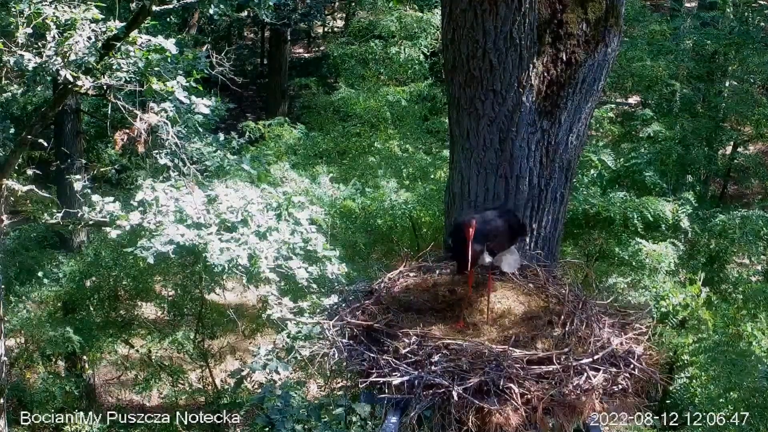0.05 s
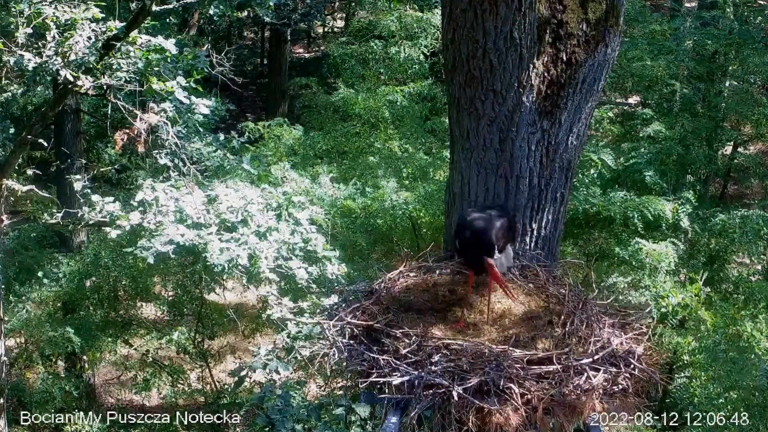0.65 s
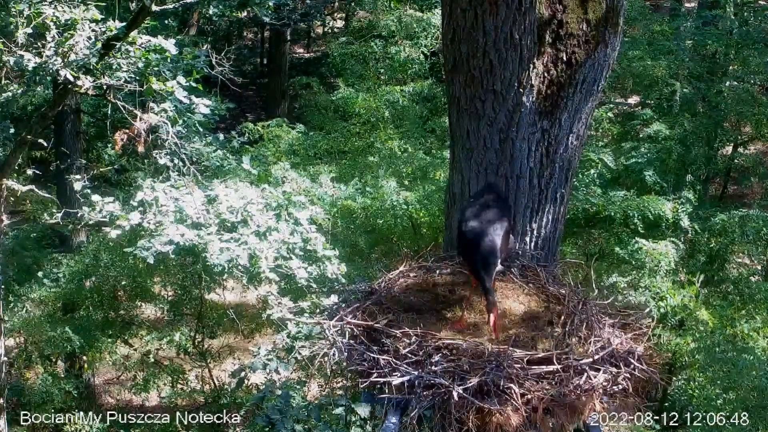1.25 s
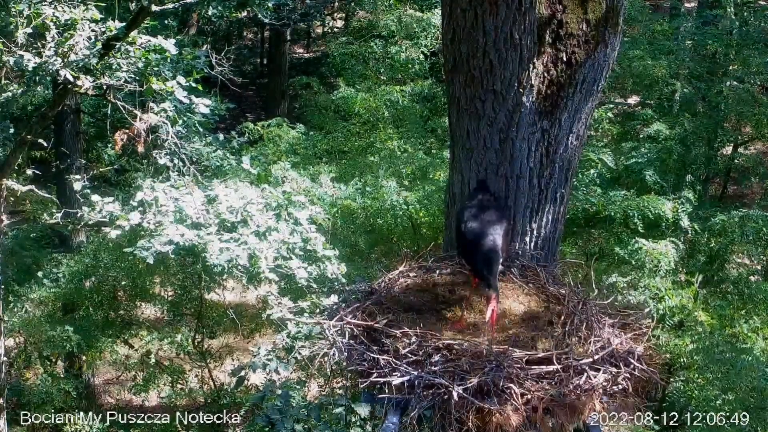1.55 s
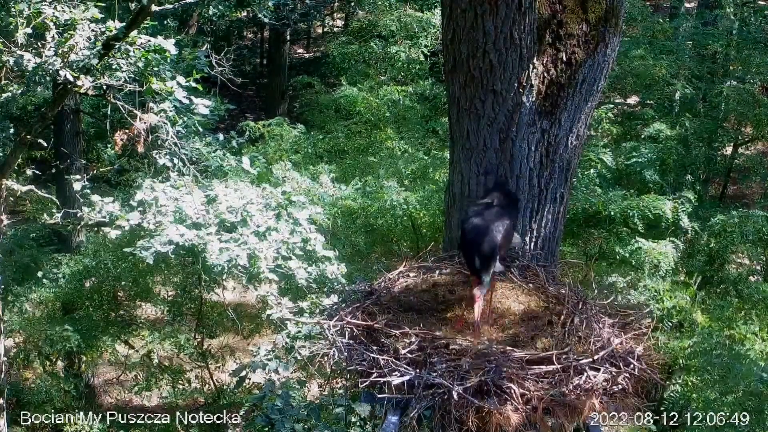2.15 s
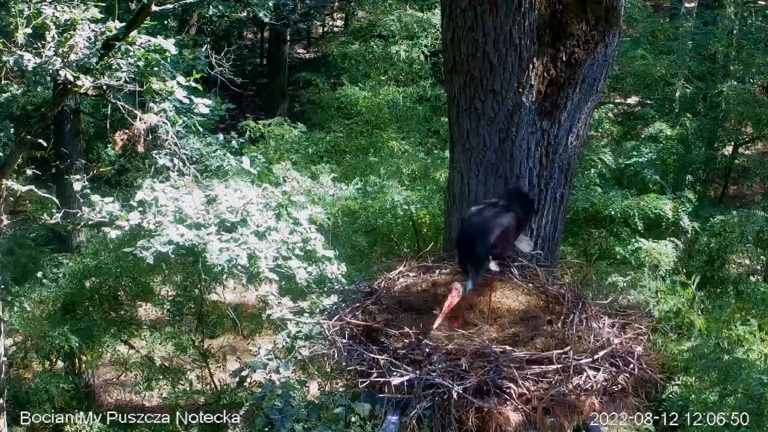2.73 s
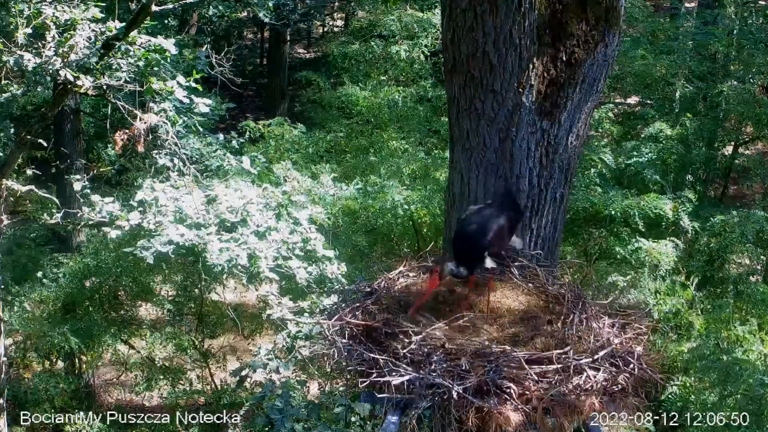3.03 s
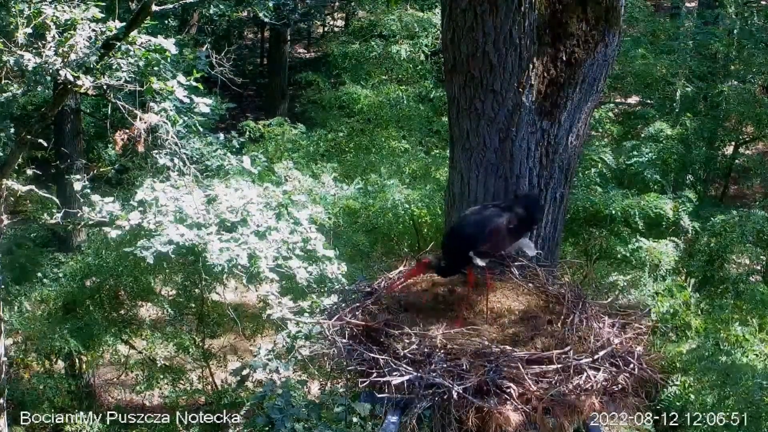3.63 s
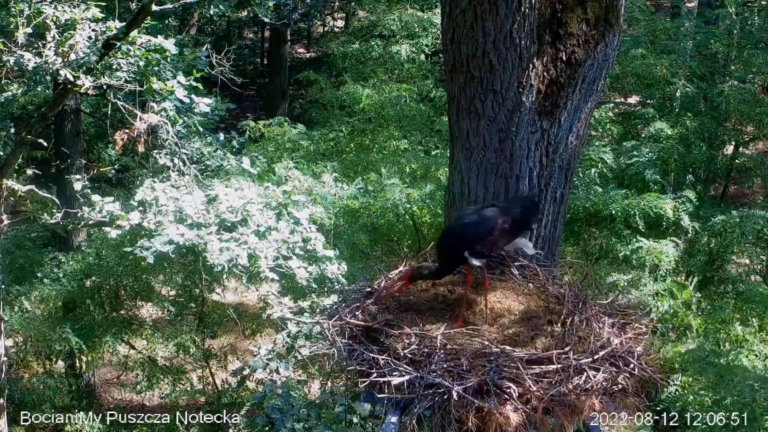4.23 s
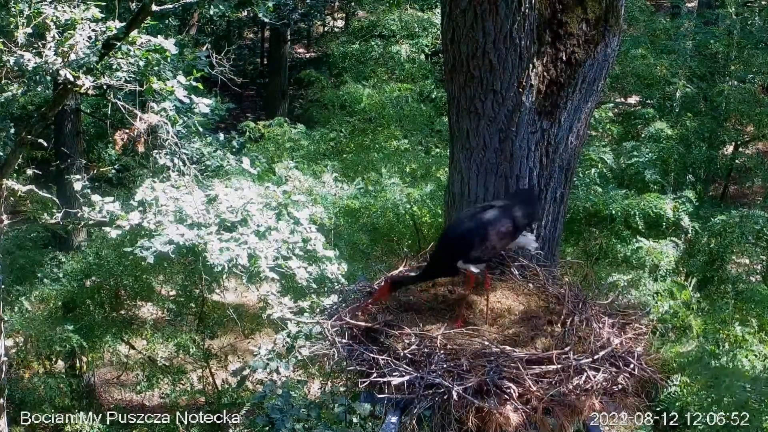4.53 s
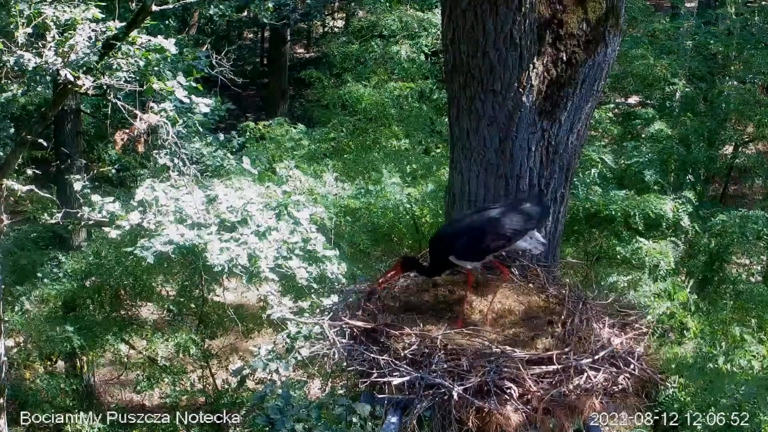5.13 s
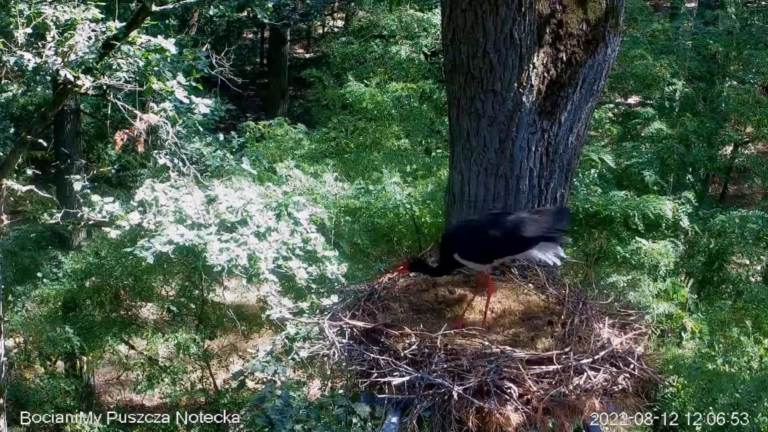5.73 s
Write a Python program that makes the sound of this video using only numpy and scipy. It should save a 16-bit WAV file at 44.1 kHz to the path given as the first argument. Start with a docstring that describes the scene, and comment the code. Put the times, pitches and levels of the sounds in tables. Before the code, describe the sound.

A young stork begs with repeated hoarse whistles and harsh hisses, while twigs snap and its steps thump softly in a forest nest.

```python
"""A young black stork begs on its nest

Each call is an arched, breathy whistle from the bird's voice box, mostly breaking to a low note,
then a harsh hiss of air in its throat. Short chirps run through the first calls.
Its steps thump through the stick nest and snap twigs. The trees return a soft echo
over a steady wash of forest air. One microphone near the nest hears it all."""
import sys
import numpy as np
from scipy import signal
from scipy.fft import rfft, irfft
from scipy.io import wavfile
from scipy.ndimage import uniform_filter1d, map_coordinates

SR = 44100
rng = np.random.default_rng(int(sys.argv[2]) if len(sys.argv) > 2 else 0)


def wav_out(sig):
    """Save sig, one row per channel (or a flat mono array), as 16-bit PCM at SR to the path in sys.argv[1]."""
    wavfile.write(sys.argv[1], SR, np.round(np.clip(np.atleast_2d(sig).T, -1, 1) * 32767).astype(np.int16))


N = 263718
TIME = np.arange(N) / SR


def whistles(overtone_db=-1, third_db=-28, breath_db=-3, jitter=.0062, hoarse_hz=280):
    """The voice box makes an unsteady, hoarse tone while air rushes through the open bill."""
    # Each row is a whistle: start, end and top of the climb in seconds, start and top pitch in Hz,
    # then in dB the tone's base level, its swell, and base levels of second harmonic, breath and rattle.
    high_notes = [ (.163, 0.425, .335, 1895, 1965, -29, 14, -39, -31, -42.5),
                  (0.799, 1.091, 1.0, 1915, 2057, -24.5, 15, -34, -27.5, -31.5),
                  (1.514, 1.87, 1.63, 2220, 2311, -23.5, 9.5, -33.5, -32.5, -27),
                  (2.308, 2.58, 2.48, 2053, 2123, -27.5, 2, -41.5, -33, -34.5),
                  (3.028, 3.327, 3.22, 1950, 2097, -28.5, 8.5, -35.5, -30, -30),
                  (3.808, 4.159, 3.97, 1833, 2032, -31.5, 13, -46.5, -30.5, -36),
                  (4.572, 4.869, 4.79, 2170, 2288, -25.5, 8, -43, -35, -31),
                  (5.271, 5.602, 5.48, 1947, 1985, -33.5, 4, -45, -35.5, -37.5), ]
    # Each row is a low note: start and end in seconds, start pitch in Hz,
    # base levels of the tone and its second harmonic in dB.
    low_notes = [(0.423, 0.478, 1344, -44.5, -31.5), (1.864, 1.951, 1371, -46.5, -32.5),
                 (2.573, 2.647, 1275, -48, -37), (3.321, 3.425, 1262, -40.5, -29),
                 (4.154, 4.212, 1330, -49.5, -28), (5.602, 5.675, 1226, -44.5, -35)]
    # The tone colour of the breath. Each row: frequency in Hz, gain in dB.
    breath_colour = [(900, -22.5), (1750, -13.5), (2100, -2), (2550, 2.5), (3050, -7), (3650, 6.5),
                     (4050, -1.5), (4350, -13), (5200, -12), (5800, -26.5), (7600, -28.5), (8900, -57.5)]
    # The breath's treble changes as the bird turns. Each row: time in seconds, treble gain in dB.
    facing = [(0, 2), (1, -2), (1.7, 8), (2.4, 4), (3.2, -1.5), (4, -6), (4.7, 3), (5.4, -12)]
    air = noise(breath_colour)
    air = air + (amp(np.interp(TIME, *np.transpose(facing))) - 1) * treble_of(air)
    waver = 1 + jitter * wobble(150)
    flutter = amp(.9 * wobble(90) + 1.4 * wobble(22))
    # The air stream rattles the membrane, adding ragged sound just above and below the tone.
    rattle = np.exp(2j * np.pi * np.cumsum(hoarse_hz * (1 + .29 * wobble(60))) / SR)
    hoarse = .5 * (rattle * wobble(60) + wobble(49) / rattle)
    rasp = 1 + .22 * (wobble(300) + 1j * wobble(300))
    notes = [whistle_shape(*row) for row in high_notes] + [low_note_shape(*row) for row in low_notes]
    out, ragged = np.zeros(N), np.zeros(N)
    for at, gate, hz, db, second_db, air_db, rattle_db in notes:
        wave = np.exp(2j * np.pi * np.cumsum(hz * waver[at]) / SR)
        # The tone falters while the pitch leaps.
        leap_speed = uniform_filter1d(np.gradient(np.log(hz)) * SR / 20, size=130)
        held = 1 / (1 + leap_speed ** 2)
        overtones = amp(second_db + overtone_db) * rasp[at] * (wave ** 2 + amp(third_db) * wave ** 3)
        tone = np.sqrt(2) * held * flutter[at] * (amp(db) * wave + overtones).imag
        out[at] += gate * (tone + amp(air_db + breath_db) * air[at])
        ragged[at] += gate * amp(rattle_db) * (hoarse[at] * wave).imag
    return out + coloured(ragged, breath_colour)


def whistle_shape(start, end, top_s, start_hz, top_hz, level_db, swell_db, second_db, air_db, rattle_db):
    """A whistle climbs and swells, leaps in pitch, and sags as the air runs out."""
    # The voice slips up to a higher pitch, then drops back.
    # Each row: start, end and rise time in seconds, pitch step in Hz, level step in dB.
    leaps = [(.886, 1.049, .008, 200, 6.5), (1.002, 1.038, .008, 235, -1), (1.565, 1.819, .045, 107, 8),
             (1.684, 1.818, 0.0061, 166, -5), (3.062, 3.29, .008, 153, 6.5), (3.929, 4.089, 0.0088, 52, 0),
             (4.616, 4.813, .028, 19, 9), (4.638, 4.813, 0.13, 148, 1), (5.306, 5.566, 0.011, 148, 10)]
    sag_s, sag_to_hz, sag_db = .09, 1750, -12.5
    usual_hz, overtone_db_per_octave = 2122, -30
    at, t = span(start, end)
    to_climb = np.clip((top_s - t) / (top_s - start), 0, 1)
    sag = np.clip(1 - (end - t) / sag_s, 0, 1) ** 2.3
    hz = top_hz + (start_hz - top_hz) * np.sin(np.pi / 2 * to_climb) ** 2 + (sag_to_hz - top_hz) * sag
    db = level_db - swell_db * to_climb + sag_db * sag
    for up, down, rise_s, step_hz, step_db in leaps:
        leapt = ramp(t, up, down, rise_s, release_s=.0098)
        hz, db = hz + step_hz * leapt, db + step_db * leapt
    # The throat passes less of the second harmonic as the pitch rises.
    throat_db = overtone_db_per_octave * np.log2(hz / usual_hz)
    effort_db = db - db.max()  # harmonic, breath and rattle partly follow the tone's level
    gate = ramp(t, start, end, attack_s=.013, release_s=.022)
    return (at, gate, hz, db, second_db + .5 * effort_db + throat_db,
            air_db + .31 * effort_db, rattle_db + .43 * effort_db)


def low_note_shape(start, end, start_hz, level_db, second_db, end_hz=1050, swell_db=10):
    """A whistle breaks into a low note that slides down; its second harmonic and breath die first."""
    at, t = span(start, end)
    progress = (t - start) / (end - start)
    hz = start_hz * (end_hz / start_hz) ** (progress ** .91)
    db = level_db + swell_db * (np.sin(np.pi * progress) - 1)
    air_db, rattle_db = -45 - 13.5 * progress, db - 4.5
    gate = ramp(t, start, end, attack_s=.004, release_s=.0041)
    return at, gate, hz, db, second_db - 21 * progress, air_db, rattle_db


def hisses(usual_treble_db=-13, rasp_db=.5, rasp_hz=350, shut_db=-1.5, shut_treble_db=-4):
    """Air sputters in the throat, which rings higher as the bill opens and lower as it snaps shut."""
    # Each row is a hiss: start and end in seconds, base level in dB, treble setting in dB.
    bursts = [(-.18, .05, -22.5, -13), (.495, .722, -25, -16), (1.223, 1.468, -24.5, -11),
              (1.974, 2.188, -26.5, -11.5), (2.664, 2.911, -26, -11.5), (3.446, 3.674, -26, -21),
              (4.224, 4.475, -29, -18.5), (4.946, 5.178, -32, -21), (5.694, 5.919, -30, -27)]
    # The throat's tone colour in a hiss. Each row: frequency in Hz, gain in dB.
    hiss_colour = [(900, -30), (1750, -25), (2050, -11.5), (2400, -3.5), (2700, 0), (3050, -9), (3600, 1.5),
                   (4000, -8.5), (4300, -14.5), (4750, -9.5), (5350, -18.5), (5800, -31), (7600, -29.5),
                   (8900, -65)]
    sputter = rng.standard_normal(N) * amp(rasp_db * wobble(rasp_hz))
    air = unit_level(coloured(sputter, hiss_colour))
    out, treble = np.zeros(N), treble_of(air)
    for start, end, level_db, treble_db in bursts:
        at, t = span(start, end)
        opening = np.sin(np.pi * ((t - start) / (end - start)) ** 1.25)
        # A shut bill makes the hiss duller and weaker.
        treble_gain = amp(treble_db + shut_treble_db * (1.5 - opening) - usual_treble_db)
        hiss = air[at] + (treble_gain - 1) * treble[at]
        loudness = amp(level_db + shut_db * (2 - opening))
        gate = ramp(t, start, end, attack_s=.025, release_s=.026)
        position = np.cumsum(1 + .09 * (opening - opening.mean()))  # played faster, it sounds higher
        out[at] += gate * loudness * map_coordinates(hiss, [position], order=5, mode="mirror")
    return out


def chirps(harmonics=8, lowest_db=-37, lowest_db_per_octave=22):
    """The pitch flicks up and down, sweeping its harmonics through the ranges where the throat rings."""
    # Each row is a chirp: time of its top in seconds, base pitch in Hz, gain of its overtones in dB.
    flicks = [(.114, 1460, -16), (.301, 1386, -20.5), (.503, 1310, -20.5), (.709, 1264, -21.5),
              (.908, 1145, -26), (1.121, 1164, -25), (1.339, 1107, -29.5), (1.538, 1162, -31)]
    # The shape of every chirp. Each row: seconds from its top, share of the base pitch, gain in dB.
    shape = [(-.032, 0.51, -24), (-.016, 0.78, -13.5), (-.010, 0.8, -9.5), (-.004, 0.82, -1.5),
             (0, 0.97, -1.5), (.004, 0.93, 1), (.008, 0.77, -3), (.014, 0.76, -11.5), (.022, 0.43, -16)]
    # The throat's tone colour in a chirp. Each row: frequency in Hz, gain in dB.
    chirp_colour = [(1100, -24), (1450, -18.5), (1800, -17.5), (2300, -8.5), (2900, -1), (3500, -0.5),
                    (4100, -9), (4600, -21.5), (5400, -18.5), (6000, -55), (7300, -30.5), (8200, -38),
                    (9200, -60)]
    waver, scratch = 1 + .009 * wobble(500), amp(2 * wobble(300))
    out = np.zeros(N)
    for top_s, base_hz, overtones_db in flicks:
        at, gate, (share, db) = curves([(top_s + dt, share, db) for dt, share, db in shape])
        hz = base_hz * share
        phase = 2 * np.pi * np.cumsum(hz * waver[at]) / SR
        lowest = amp(lowest_db + lowest_db_per_octave * np.log2(share)) * np.sin(phase)
        overtones = sum(amp(look_up(chirp_colour, k * hz)) * np.sin(k * phase)
                        for k in range(2, harmonics + 1))
        out[at] += gate * amp(db) * np.sqrt(2) * scratch[at] * (lowest + amp(overtones_db) * overtones)
    return out


def twigs(ring_s=.00032, tick_hz=5200, tick_s=.00013, rattle_db=-19, rattle_s=.008):
    """A dry stick, snapped or pecked, gives a dead knock and a bright tick; its neighbours rattle."""
    # Each row: time in seconds, base level in dB, knock pitch in Hz, tick compared with knock in dB.
    snaps = [(.957, -15.5, 950, -9), (1.194, -29.5, 1407, 1.5), (1.496, -42.5, 1300, 10),
             (2.22, -31.5, 1720, -11), (2.703, -8, 1140, -17.5), (2.711, -16, 1550, -0.5),
             (2.9876, -10, 1300, -21.5), (3.011, -21.5, 2900, -14), (3.087, -25.5, 1194, -1),
             (3.414, -14.5, 1200, -33), (3.417, -42, 900, -6), (4.148, -19, 1400, -5),
             (4.525, -30.5, 2700, -11)]
    # The tone colour of the sticks. Each row: frequency in Hz, gain in dB.
    twig_colour = [(100, -11), (500, -4.5), (5500, 10), (6500, -3.5), (8000, -3), (9200, -40)]
    out, t = np.zeros(N), np.arange(4000) / SR
    for start, db, hz, tick_db in snaps:
        knock = np.sin(2 * np.pi * hz * t) * np.exp(-t / ring_s)
        tick = amp(tick_db) * np.sin(2 * np.pi * tick_hz * t) * np.exp(-t / tick_s)
        rattle = unit_level(signal.fftconvolve(rng.standard_normal(len(t)), knock + tick)[:len(t)])
        add(out, start, amp(db) * (knock + tick + amp(rattle_db) * rattle * np.exp(-t / rattle_s)))
    return coloured(out, twig_colour)


def nest(cycles=.55, half_thump_s=.03, resting_db=-49.5, step_sway_db=-17, step_sway_s=.023):
    """Each step or low twig knock swings the nest about once, with a thump; these and shuffling stir its low
    sway."""
    # Each row is a firm step or a low knock of a twig: time in seconds, base level in dB, pitch in Hz.
    thumps = [(.34, -26, 98.4), (.368, -20, 102.4), (0.576, -24, 72.9), (.645, -23, 96), (.734, -25.5, 94),
              (0.778, -24, 100), (0.99, -26.5, 90.5), (1.717, -24.5, 78.4), (2.103, -29.5, 74),
              (2.797, -25, 97), (2.825, -21.5, 140), (2.909, -23, 125), (2.95, -24.5, 98), (3.006, -15, 93),
              (3.027, -20.5, 98), (3.084, -25, 131), (3.115, -21, 99), (3.246, -18, 113),
              (4.466, -22.5, 125), (4.511, -28, 275), (4.521, -22, 86.5), (4.758, -19.5, 106),
              (5.511, -30, 98), (5.563, -27.5, 90), (5.666, -29, 90.5), (5.687, -28, 98), (5.834, -31, 85)]
    # Each row is a spell of shuffling: start and end in seconds, level in dB.
    shuffles = [(-.1, 0.458, -44.5), (0.544, 1.104, -43.5), (1.305, 1.442, -44), (3.052, 3.163, -34),
                (4.276, 4.797, -40), (5.475, 6.1, -42.5)]
    # The rumble of the swaying nest. Each row: frequency in Hz, gain in dB.
    sway_colour = [(15, -9.5), (30, 2.5), (70, 1), (130, -8.5), (200, -15.5), (350, -31.5), (700, -65.5)]
    out, sway = np.zeros(N), np.full(N, amp(resting_db))
    t = np.arange(-half_thump_s, half_thump_s, 1 / SR)
    for step_s, db, hz in thumps:
        thump = -np.sin(2 * np.pi * hz * t) * np.exp(-(hz * t / cycles) ** 2)
        add(out, step_s - half_thump_s, amp(db) * thump)
        sway += amp(db + step_sway_db) * np.exp(-abs(TIME - step_s) / step_sway_s)
    for start, end, db in shuffles:
        sway += amp(db) * ramp(TIME, start, end, attack_s=.034, release_s=.034)
    return out + noise(sway_colour) * sway


def tree_echo(x, first_s=.008, near_db=6, near_s=.013, echoes_per_s=1500):
    """The trunk and nest scatter early echoes, the trees many weak late ones."""
    # How long the echo lasts. Each row: frequency in Hz, seconds to fade by 60 dB.
    fade_times = [(500, 1), (2200, 0.66), (3700, 0.78), (8000, 0.18)]
    t = TIME[:SR]
    echoes = rng.standard_normal(SR) * (rng.random(SR) < echoes_per_s / SR) * (t > first_s)
    echoes *= 1 + amp(near_db) * np.exp(-t / near_s)
    hz, t, bands = signal.stft(echoes, SR, nperseg=256)
    fade = amp(-60 * t / look_up(fade_times, hz)[:, None])
    tail = signal.istft(bands * fade, SR, nperseg=256)[1]
    return signal.fftconvolve(x, tail / np.linalg.norm(tail))[:N]


def forest(level_db=-42, swell_db=.4):
    """A steady wash of forest air and microphone hiss, with the calls' lingering ring."""
    # The tone colour of the wash. Each row: frequency in Hz, gain in dB.
    forest_colour = [(25, 12.5), (70, -5), (160, -6.5), (400, -11), (620, -7), (1150, -8), (1750, -9.5),
                     (2500, -5.5), (3100, -12.5), (3650, -0.5), (4300, -15), (5200, -19), (5900, -24),
                     (7600, -26), (8900, -37), (10500, -37.5), (11300, -35), (12500, -38), (14500, -44)]
    return amp(level_db + swell_db * wobble(6.3)) * noise(forest_colour)


def amp(db):
    """Turns decibels into a gain."""
    return 10 ** (np.asarray(db) / 20)


def unit_level(x):
    """Scales a sound to an average (rms) level of 1."""
    return x / np.sqrt(np.mean(x ** 2) + 1e-20)


def look_up(points, hz):
    """Reads between the rows of a table, with octaves evenly spaced."""
    row_hz, value = np.transpose(points)
    return np.interp(np.log(hz + 1), np.log(row_hz + 1), value)


def coloured(x, colour):
    """Filters a sound by a table of gains."""
    return irfft(rfft(x) * amp(look_up(colour, np.fft.rfftfreq(len(x), 1 / SR))), len(x))


def noise(colour):
    """Noise of level 1 with the given tone colour."""
    return unit_level(coloured(rng.standard_normal(N), colour))


def wobble(rate_hz):
    """Random drift of level 1, mostly slower than the rate."""
    hz = np.fft.rfftfreq(N, 1 / SR)
    return unit_level(irfft(rfft(rng.standard_normal(N)) * np.exp(-(hz / rate_hz) ** 2), N))


def treble_of(x, split_hz=4250):
    """The part of a sound above the throat's main ringing."""
    return signal.sosfiltfilt(signal.butter(6, split_hz, "high", fs=SR, output="sos"), x)


def ramp(t, start, end, attack_s, release_s):
    """Rises from 0 to 1, holds, and falls back."""
    return np.clip(np.minimum((t - start) / attack_s, (end - t) / release_s), 0, 1)


def span(start, end):
    """The samples between two times, and their times."""
    at = np.flatnonzero((TIME >= start) & (TIME <= end))
    return at, TIME[at]


def curves(rows, fade_s=.004):
    """The samples that a table covers, a fade in and out, and its columns as curves."""
    times, *columns = np.transpose(rows)
    start, end = times[0] - fade_s, times[-1] + fade_s
    at, t = span(start, end)
    return at, ramp(t, start, end, fade_s, fade_s), [np.interp(t, times, c) for c in columns]


def add(mix, start_s, sound):
    """Mixes a sound in at a time."""
    part = mix[max(round(start_s * SR), 0):][:len(sound)]
    part += sound[:len(part)]


def scene(echo_db=-14, chirp_echo_db=-8):
    """Bird, nest and forest at one microphone, alike in both channels."""
    near, chirping = whistles() + hisses() + twigs(), chirps()
    echo = tree_echo(amp(echo_db) * near + amp(chirp_echo_db) * chirping)
    mono = near + chirping + echo + nest() + forest()
    return np.array([mono, mono])


def record(dry, cutoff_hz=14600):
    """Cuts off the highest treble."""
    low_pass = signal.firwin(511, cutoff_hz, window=("kaiser", 9), fs=SR)
    return signal.oaconvolve(dry, low_pass[None], "same")


dry = scene()
out = record(dry)
wav_out(out)
```